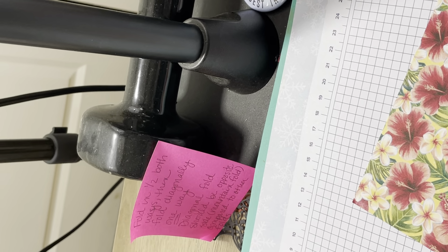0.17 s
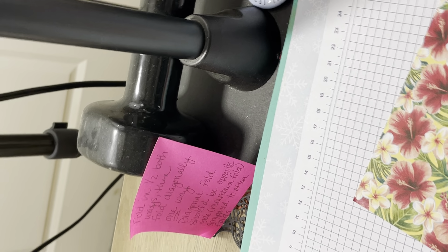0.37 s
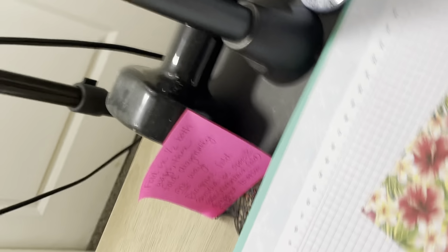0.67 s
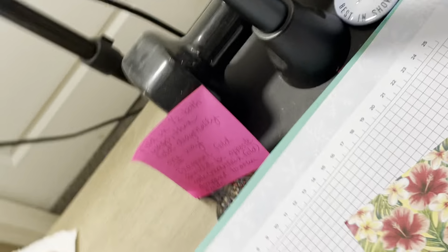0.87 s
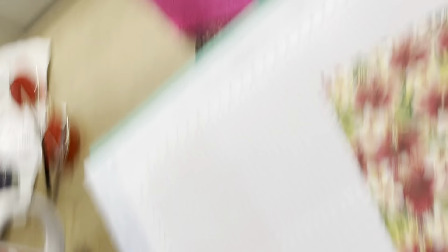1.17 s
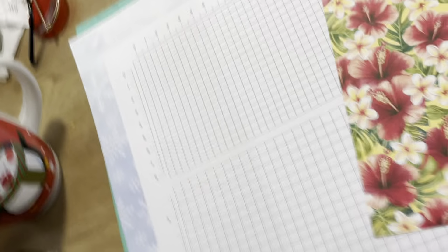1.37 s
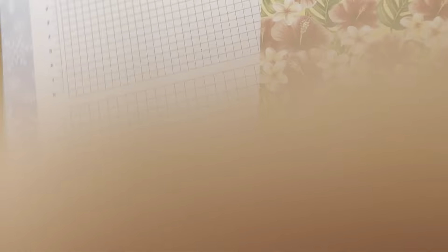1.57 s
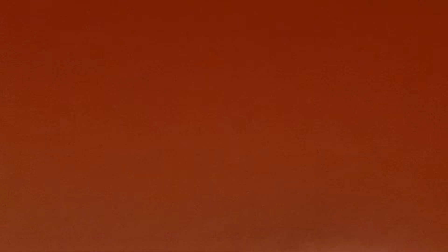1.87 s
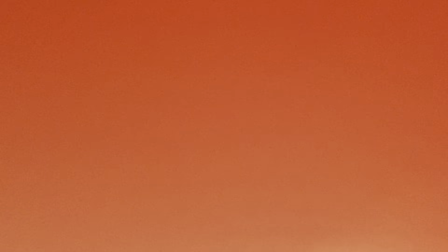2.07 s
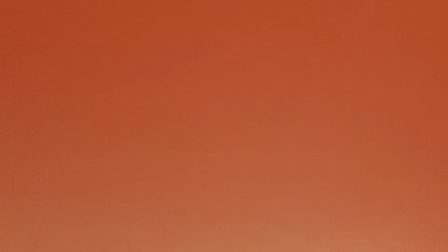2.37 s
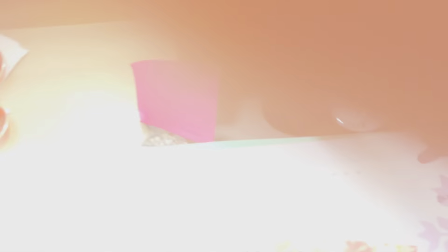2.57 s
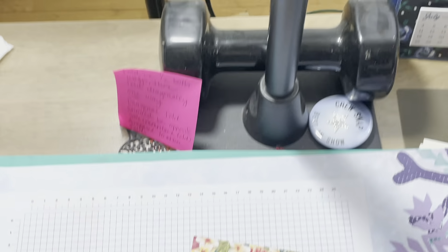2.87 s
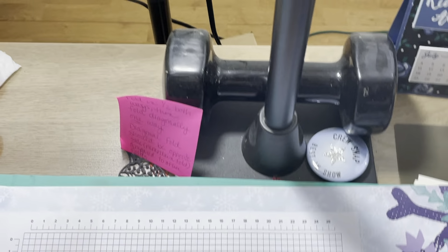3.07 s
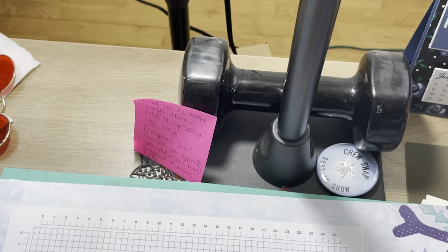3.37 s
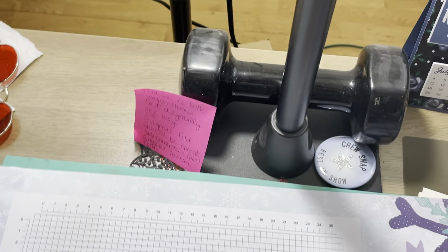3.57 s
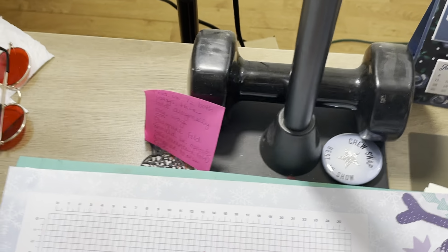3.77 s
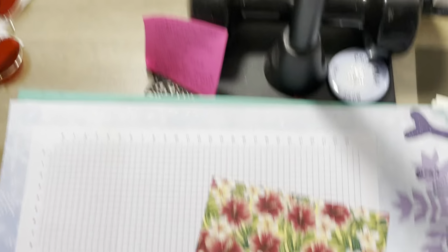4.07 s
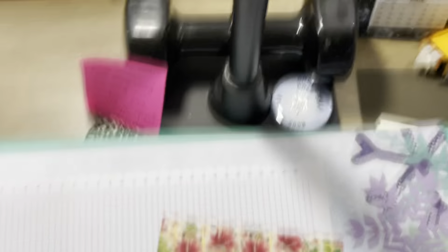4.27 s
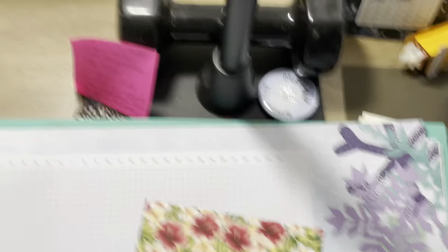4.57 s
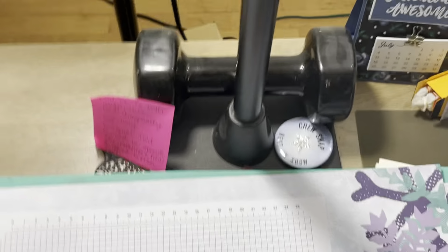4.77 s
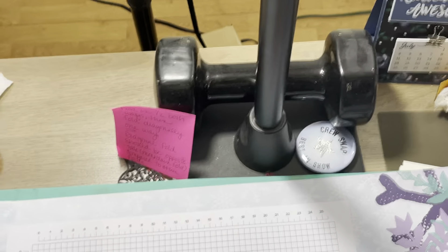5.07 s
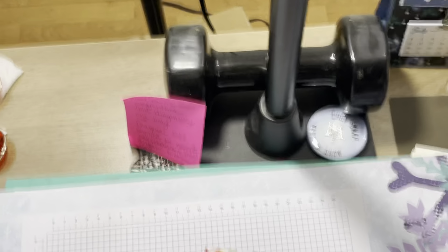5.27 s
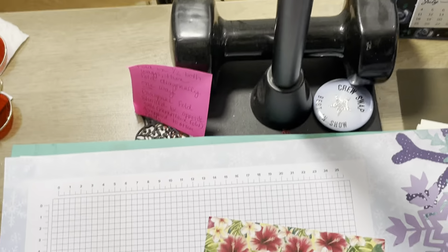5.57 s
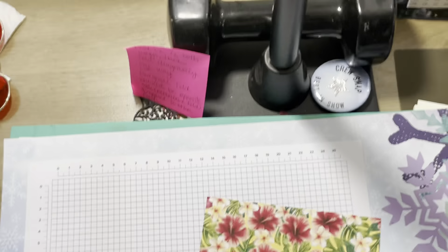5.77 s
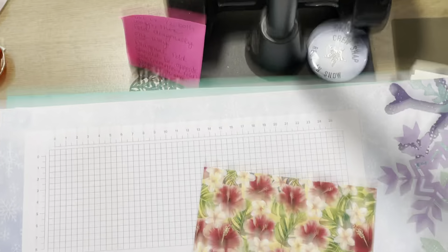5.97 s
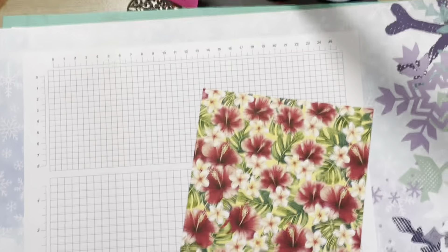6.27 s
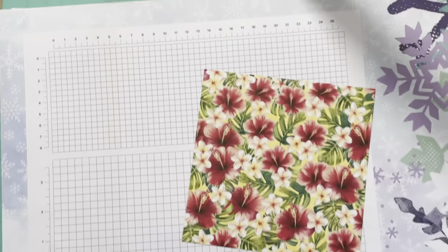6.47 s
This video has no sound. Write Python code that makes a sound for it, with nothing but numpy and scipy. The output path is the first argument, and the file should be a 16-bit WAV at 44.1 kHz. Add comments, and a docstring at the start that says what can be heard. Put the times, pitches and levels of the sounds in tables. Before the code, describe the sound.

Fingers rub over a small camera close up, with irregular knocks and thumps against its holder and a short creak in a quiet room.

```python
"""A small camera is handled above a craft desk in a quiet room. First fingers slide over its case,
hissing and faintly squeaking. Near 1.5 s it knocks and thumps against its holder, then light rubs and
taps go on. The loudest knock comes at 4.3 s, with more close behind. Around 5.5 s a joint of the
holder creaks as it is turned, then settles with tiny clicks among the last knocks. Most of the sound
comes through the case, so it reaches both microphone ports (the sound holes) almost alike."""
import sys
import numpy as np
from scipy import signal
from scipy.fft import rfft, irfft, next_fast_len
from scipy.io import wavfile
from scipy.ndimage import uniform_filter1d

SR = 44100
rng = np.random.default_rng(int(sys.argv[2]) if len(sys.argv) > 2 else 0)


def pcm_store(signal):
    """Save signal as 16-bit PCM."""
    levels = np.round(np.clip(np.atleast_2d(signal), -1, 1) * 32767)
    wavfile.write(sys.argv[1], SR, levels.astype(np.int16).T)


N = 292383

LEAD_IN_S = 0.006  # a short lead-in so the knock's ring can swell just before its tick
# the tones the case rings with: pitch_multiple, level_db, swell_s
CASE_TONES = [(1, 2, 0.0023), (.42, -8.5, 0.0026), (1.8, 3.5, 0.0012), (3.6, -10, 0.00091)]
# knocks on the case: time_s, level_db, pitch_hz, upper_tones_db, tick_db, bright_tick_db
# (the last three are relative to the knock's level)
KNOCKS = [(0.744, -46, 595, -28, -27, -29), (1.119, -44.5, 503, -2, -5.5, -23), (1.235, -39, 580, 1, 3, -5),
          (1.267, -43, 530, 2, 6, 2.5), (1.285, -45, 577, -4, -5, -30), (1.41, -35, 517, 3, 3.5, -19),
          (1.442, -40.5, 540, -15, 10, -26), (1.494, -24.5, 627, 20, -0.5, -30),
          (1.506, -41, 637, 14, 5, -28), (1.555, -41, 484, 5, 5.5, -31), (1.572, -43, 500, 8, 1, -35),
          (1.601, -45, 525, 2, -2, -52), (1.624, -46.5, 493, 0, -4.5, -28), (1.65, -48, 500, -1, 3, -30),
          (1.721, -37, 347, 0.5, -2, -16), (1.872, -38.5, 340, 2, -3, -12),
          (2.559, -49.5, 350, 0, -15, -27), (3.279, -26.5, 744, -18, -12.5, -20.5),
          (3.58, -50, 350, -0.5, -15, -11), (3.973, -41, 378, -8, -43, -15.5),
          (4.192, -29, 463, -29, 7.5, 11), (4.1945, -34.5, 553, -28, 14, -1),
          (4.234, -45, 682, -4, -1, -18), (4.328, -1.5, 782, -1.5, -9.5, -40),
          (4.356, -20.5, 560.6, -8, -4.5, 0.5), (4.3585, -23, 788, 1.5, -11, -15),
          (4.375, -17, 738, -9, -12, -28), (4.622, -53, 293.3, -7, 0, -27),
          (4.8465, -35, 623, -15, -5, -13.5), (4.8518, -17, 630, 5.5, -3.5, -27.5),
          (4.878, -33, 470, -5, -8, -32), (4.8833, -15, 640.5, -1, -12, -15),
          (5.088, -43.5, 615, -8, -38, -30), (5.173, -37.5, 535, -19, -28.5, -24),
          (5.23, -18, 723, -1, -6.5, -24.5), (5.293, -38.5, 355.8, -9, -8, -10),
          (5.335, -36.5, 666, 0, -1, -4), (6.003, -43.5, 320, -3, -3.5, -11),
          (6.053, -22.5, 724, -5, -2.5, -21), (6.065, -34, 331, -7, -23, -4),
          (6.155, -22.5, 610.5, -8, -10.5, -8), (6.232, -37, 339.4, 1, 0, -32),
          (6.488, -39.5, 317, -5, -20, -14), (6.513, -44, 610, -19, -35, -28),
          (6.551, -45.5, 504, -12, -11.5, -10), (6.615, -49, 610, -27.5, -31, -33)]
def knock(level_db, pitch_hz, upper_tones_db, tick_db, bright_tick_db):
    """The case swells into a brief ring that the hand damps; hard contact ticks, then faintly rattles."""
    hiss = rng.standard_normal(SR // 8)
    t = np.arange(len(hiss)) / SR - LEAD_IN_S
    ring = np.zeros(len(t))
    for multiple, tone_db, swell_s in CASE_TONES:
        swell = np.exp(-(t / swell_s - 1) ** 2)  # the high tones peak first
        gain = gain_of(tone_db + upper_tones_db * (multiple > 1))
        ring += gain * swell * np.sin(2 * np.pi * multiple * pitch_hz * t)
    after = np.maximum(t, 0)
    fade = gain_of(-60 * after / 0.0039) + gain_of(-34.5 - 60 * after / 0.13)
    burst = hiss * (1 - np.exp(-after / 0.00079)) * fade
    snap = gain_of(4.5) * signal.unit_impulse(len(t), round(LEAD_IN_S * SR) + 1)
    ticks = gain_of(tick_db) * unit_peak(band(burst + snap, 770, 5400))
    ticks += gain_of(bright_tick_db) * unit_peak(band(burst, 7100, 8600))
    near_pitch = (0.6 * pitch_hz, 1.2 * pitch_hz)
    rattle = unit_rms(band(band(hiss, *near_pitch), *near_pitch)) * gain_of(-20 - 60 * after / 0.09)
    rattle += unit_rms(band(hiss, 1.3 * pitch_hz, 2.8 * pitch_hz)) * gain_of(-25 - 60 * after / 0.06)
    return gain_of(level_db) * (unit_peak(ring) + rattle * (t >= 0) + ticks)


# bumps against the holder: start_s, level_db, final_pitch_hz, fade_s (time to fall by 60 dB)
THUMPS = [(1.494, -17, 54.7, 0.14), (1.746, -35.5, 68, 0.26), (1.87, -41, 101.5, 0.15),
          (2.582, -26, 96, 0.01), (3.279, -35, 72.5, 0.14), (4.195, -22, 70.6, 0.013),
          (4.332, -21.5, 77.1, 0.087), (4.357, -14.5, 71.3, 0.058), (4.375, -31, 53.4, 0.15),
          (4.852, -25, 69.6, 0.07), (4.89, -27, 57.7, 0.19), (5.232, -15.5, 56.7, 0.075),
          (5.337, -29.5, 69, 0.14), (6.056, -31.5, 87.7, 0.29), (6.165, -34, 79, 0.28),
          (6.244, -35.5, 139.5, 0.41)]
def thump(level_db, final_pitch_hz, fade_s, first_pitch_hz=416):
    """A bend runs along the holder, high tones first, so the pitch falls; its arm shudders on."""
    t = np.arange(SR // 3) / SR
    pitch_hz = final_pitch_hz + (first_pitch_hz - final_pitch_hz) * np.exp(-t / 0.005)
    wave = gain_of(-60 * (t / fade_s) ** 1.11) * np.sin(2 * np.pi * np.cumsum(pitch_hz) / SR)
    shudder = gain_of(-15 - 60 * t / 0.18) * unit_rms(band(rng.standard_normal(len(t)), 36, 240))
    rise = 1 - np.exp(-t / 0.0032)
    return gain_of(level_db) * rise * (wave + shudder)


# the tones of one slip's click and of the joint's ring: pitch_hz, width_hz (wider dies sooner), level_db
CLICK_TONES = [(2210, 330, -6), (2850, 430, 5), (4020, 2100, 1.5), (6600, 3600, 12.5), (7600, 1300, -23),
               (13500, 3300, 8)]
JOINT_TONES = [(238.5, 190, 4.5), (741, 95, 10), (880, 69, -3), (1390, 290, -9)]
# the turning joint, one list for each run of slips: time_s, slips_per_s, click_db, ring_db
CREAKS = [
    [(5.372, 177, -50, -48), (5.392, 163, -67, -54.5)],
    [(5.404, 180, -49.5, -49), (5.424, 165, -41.5, -46)],
    [(5.44, 100, -45, -63), (5.454, 128, -40, -31), (5.468, 208, -41.5, -57), (5.478, 111, -36.5, -45),
     (5.497, 155, -45.5, -34), (5.508, 246, -38, -37), (5.556, 321, -47, -36.5), (5.566, 356, -77, -51.5),
     (5.596, 260, -52, -38.5), (5.608, 140, -52, -43.5), (5.63, 160, -53, -50)],
]
def creak(run):
    """The joint sticks and slips over and over: each slip is a sharp click that also rings the joint."""
    time_s, slips_per_s, click_db, ring_db = np.transpose(run)
    t = np.arange(time_s[0], time_s[-1], 1 / SR)
    wobble = 1 + 0.04 * drift(size=80)[:len(t)]
    slip_count = np.floor(np.cumsum(np.interp(t, time_s, slips_per_s) * wobble) / SR)
    slips = np.diff(slip_count, prepend=-1) * gain_of(rng.standard_normal(len(t)))
    clicks = np.convolve(slips * gain_of(np.interp(t, time_s, click_db)), ringing(CLICK_TONES))
    uneven_ring_db = np.interp(t, time_s, ring_db) + 2.53 * rng.standard_normal(len(t))
    rings = np.convolve(slips * gain_of(uneven_ring_db), ringing(JOINT_TONES))
    return band(clicks + rings, 156, 8400)


# single slips as the joint settles: start_s, click_db, ring_db
SETTLING_SLIPS = [(6.178, -62, -51.5), (6.188, -57, -60), (6.197, -63, -56), (6.218, -56, -61),
                  (6.271, -59, -52), (6.296, -62, -62), (6.312, -69, -74), (6.445, -75, -58.5),
                  (6.564, -66, -63), (6.597, -71, -70)]
def settling_slip(click_db, ring_db):
    """One slow slip scuffs for 3 ms and rings the joint."""
    scuff = rng.standard_normal(130)
    ring = ringing(JOINT_TONES)
    click = np.convolve(scuff / np.linalg.norm(scuff), ringing(CLICK_TONES))[:len(ring)]
    return band(gain_of(click_db) * click + gain_of(ring_db) * ring, 166, 9140)


# the tone colours of two hisses and of the case scraping under the skin: pitch_hz, level_db
FINE_HISS = [(5000, -70.5), (7500, -28.5), (9000, -3), (11500, -7), (13800, -3.5), (15500, -10),
             (15900, -72.5)]
COARSE_HISS = [(2000, -71.5), (3800, -17), (5200, -7.5), (7500, -3.5), (9000, -5), (11500, -16.5),
               (14000, -78)]
SCRAPE = [(60, -69), (300, 8), (700, 7.5), (1100, -1), (1400, 5), (1750, -0.5), (2100, -1.5), (2330, 2.5),
          (2550, -1.5), (3100, -4.5), (3800, -8.5), (5000, -14), (6500, -24.5), (10000, -72.5)]
# finger strokes: start_s, swell_s, fade_s, fine_hiss_db, coarse_hiss_db, scrape_db
STROKES = [(0.362, 0.0042, 0.032, -80, -95, -74), (0.442, 0.0027, 0.079, -100, -78, -70.5),
           (0.529, 0.016, 0.074, -82, -84.5, -72.5), (0.748, 0.078, 0.1, -78, -77, -67.5),
           (0.947, 0.0051, 0.14, -82, -86.5, -71), (1.115, 0.014, 0.75, -76.5, -75.5, -65),
           (1.351, 0.087, 0.035, -58, -60.5, -56), (1.453, 0.046, 0.0054, -44.5, -45, -45),
           (1.498, 0.0072, 0.045, -60, -66, -59), (1.625, 0.083, 0.23, -71, -71, -60),
           (1.875, 0.15, 0.081, -68, -69, -63.5), (2.143, 0.14, 0.094, -79, -75.5, -68),
           (2.383, 0.037, 0.065, -81, -74, -69), (2.581, 0.042, 0.019, -72, -80, -59),
           (2.61, 0.073, 0.025, -69.5, -74, -64), (2.7, 0.051, 0.016, -69, -68, -65.5),
           (2.948, 0.016, 0.06, -85, -90, -74), (3.283, 0.01, 0.096, -82, -77, -72),
           (3.75, 0.031, 0.035, -67.5, -66.5, -62.5), (4.09, 0.12, 0.061, -83, -76, -70.5),
           (4.195, 0.0018, 0.036, -53, -51.5, -51.5), (4.245, 0.01, 0.089, -85, -70.5, -68),
           (4.332, 0.013, 0.079, -64.5, -61, -55.5), (4.677, 0.049, 0.018, -68, -65, -75.5),
           (4.856, 0.023, 0.12, -79.5, -73, -62.5), (5.14, 0.087, 0.014, -65, -72, -60),
           (5.243, 0.064, 0.012, -69, -79, -60), (5.326, 0.0041, 0.093, -66, -67, -55),
           (5.441, 0.038, 0.16, -82, -65, -53.5), (5.63, 0.046, 0.14, -81, -75.5, -67.5),
           (5.75, 0.055, 0.01, -64.5, -62, -57.5), (6.057, 0.013, 0.11, -84, -84, -75),
           (6.159, 0.011, 0.16, -73, -73.5, -68.5), (6.419, 0.067, 0.034, -71.5, -82, -84)]
def sliding_fingers(land_s=0.0045, leave_s=0.037, touch_db=-10.5, lift_db=-8):
    """Skin slides over the case in strokes that start and stop quickly; uneven contact flutters."""
    t, powers = np.arange(N) / SR, np.zeros((3, N))
    for start_s, swell_s, fade_s, *levels_db in STROKES:
        times = start_s + np.cumsum([-land_s, land_s, swell_s, fade_s, leave_s])
        ends_db = np.where(t < times[2], touch_db, lift_db)
        arch_db = ends_db * np.interp(t, times[1:4], [1, 0, 1]) ** 2  # a rounded top between lower ends
        outline_db = np.interp(t, times, [-21.5, 0.5, 1.5, -1.5, -17], left=-200, right=-200)
        powers += gain_of(np.add.outer(levels_db, arch_db + outline_db)) ** 2
    layers = [noise(colour, size=512, patchy_db=db)
              for colour, db in ((FINE_HISS, 1.2), (COARSE_HISS, 1.5), (SCRAPE, 2.2))]
    return sum(np.sqrt(power) * layer * gain_of(1.8 * drift(size=100))
               for power, layer in zip(powers, layers))


# the tone colours of the hand's rumble and dull rubbing: pitch_hz, level_db
RUMBLE = [(10, -67.5), (40, -6.5), (78, 8.5), (120, -0.5), (240, -1.5), (400, -25.5), (1000, -87.5)]
RUBBING = [(60, -62), (300, 1), (550, -2), (750, -7), (1200, -14), (2200, -33.5), (6000, -71)]
# how loud the grip is over time: time_s, rumble_db, rubbing_db
GRIP = [(0.0, -72, -79), (0.41, -66, -80.5), (0.57, -61, -69.5), (1.44, -57.5, -64.5), (1.66, -56, -75),
        (2.25, -63.5, -71), (3.86, -64.5, -74.5), (4.301, -55.5, -63), (4.67, -61, -72), (4.89, -60, -70),
        (5.04, -46.5, -62), (5.21, -47.5, -57), (5.35, -51, -61), (5.48, -48, -43), (5.76, -50.5, -59.5),
        (6.0, -56.5, -63.5), (6.259, -47.5, -53.5), (6.63, -50, -70.5)]
def gripping_hand():
    """The hand shakes and presses the case, making an uneven rumble and a dull rubbing."""
    t = np.arange(N) / SR
    time_s, rumble_db, rubbing_db = np.transpose(GRIP)
    unevenness = gain_of(1.8 * drift(size=800))
    rumble = gain_of(np.interp(t, time_s, rumble_db)) * noise(RUMBLE, size=2048, patchy_db=-1.6)
    rubbing = gain_of(np.interp(t, time_s, rubbing_db)) * noise(RUBBING, size=1024, patchy_db=1.2)
    return unevenness * (rumble + rubbing)


# skin squeaking on the case: start_s, length_s, pitch_hz, level_db
SQUEAKS = [(0.761, 0.083, 2300, -76.5), (1.613, 0.23, 3720, -64), (1.637, 0.23, 5240, -72),
           (1.648, 0.16, 2920, -67), (1.648, 0.2, 4500, -74), (5.153, 0.076, 2260, -61),
           (5.145, 0.071, 1420, -59.5), (5.267, 0.051, 1580, -58), (5.372, 0.028, 1670, -48.5)]
def squeak(length_s, pitch_hz, level_db, spread=0.11):
    """Skin catches on the case: a breathy, narrow whistle swells and dies."""
    hiss = rng.standard_normal(SR // 3)
    whistle = band(hiss, pitch_hz * (1 - spread), pitch_hz * (1 + spread))[-round(length_s * SR):]
    swell = np.sin(np.linspace(0, np.pi, len(whistle)))
    return gain_of(level_db) * unit_rms(whistle) * swell


def case_bending(blows):
    """Blows also bend the case, which shifts the left and right ports in opposite ways."""
    lagging = signal.hilbert(blows, next_fast_len(N))[:N].imag  # a quarter of a cycle behind the blow
    middle = band(band(lagging, 300, 2900)[::-1], 300, 3200)[::-1]  # forwards, then backwards
    wall = band(blows, 480, 950)  # the right port sits nearer the ringing wall
    bend = gain_of(-16.5) * middle + gain_of(-26.5) * lagging + gain_of(-19.5) * wall
    return np.outer([-1, 1], bend)


# the tone colour of the quiet room: pitch_hz, level_db
ROOM_COLOUR = [(18, -58), (30, -35), (53, -32.5), (64, -3.5), (86, -2), (108, -16), (182, -19),
               (338, -37.5), (1000, -46.5), (1130, -40.5), (1270, -42.5), (1700, -39.5), (3100, -49.5),
               (8500, -52.5), (14000, -53), (15800, -75)]
def room_tone(level_db=-62):
    """A low rumble and a faint hiss lie under everything."""
    return gain_of(level_db) * noise(ROOM_COLOUR, size=2048, patchy_db=1.0)


# how alike the noise is on the left and right: pitch_hz, likeness (1 means the same)
LIKENESS = [(60, 0.87), (400, 0.89), (800, 0.28), (1700, 0.93), (3000, 1), (6000, 0.89), (8000, 1),
            (16000, 0.94)]
def noise(colour, size, patchy_db):
    """Stereo noise of rms 1, built in blocks of size samples, with louder and softer patches."""
    hop, hz = size // 4, np.fft.rfftfreq(size, 1 / SR)
    a, b, c, d, patches = rng.standard_normal((N // hop + 5, len(hz), 5)).T
    patches = uniform_filter1d(patches, size // 64, axis=0)  # smooth across pitch
    patches = unit_rms(uniform_filter1d(patches, 8192 // size, axis=1))  # and across time
    likeness = np.clip(value_at(LIKENESS, hz), -1, 1)[:, None]
    left = a + 1j * b
    right = likeness * left + np.sqrt(1 - likeness ** 2) * (c + 1j * d)
    spectra = np.array([left, right]) * gain_of(value_at(colour, hz)[:, None] + patchy_db * patches)
    return unit_rms(signal.istft(spectra, nperseg=size, noverlap=size - hop)[1][:, :N])


def ringing(tones):
    """Fading tones set off by one click."""
    t = np.arange(1500) / SR
    return sum(gain_of(db) * np.exp(-np.pi * width_hz * t) * np.sin(2 * np.pi * hz * t)
               for hz, width_hz, db in tones)


def drift(size):
    """A smooth random wander of rms 1 that changes over about size samples."""
    wander = rng.standard_normal(N)
    for _ in range(3):
        wander = uniform_filter1d(wander, size)
    return unit_rms(wander)


def band(x, low_hz, high_hz):
    """Lets through the pitches between two limits."""
    return signal.sosfilt(signal.butter(2, [low_hz, high_hz], "band", fs=SR, output="sos"), x)


def value_at(table, hz):
    """Reads between a table's rows, with octaves evenly spaced."""
    pitch_hz, value = np.transpose(table)
    return np.interp(np.log(hz + 1), np.log(pitch_hz + 1), value)


def gain_of(db):
    """Turns decibels into a multiplier."""
    return 10 ** (np.asarray(db) / 20)


def unit_rms(x):
    """Scales a sound so its average strength (rms) is 1."""
    return x / np.sqrt(np.mean(x ** 2) + 1e-20)


def unit_peak(x):
    """Scales a sound so its biggest swing is 1."""
    return x / abs(x).max()


def add(mix, start_s, sound):
    """Mixes a sound in at its start time."""
    part = mix[round(start_s * SR):][:len(sound)]
    part += sound[:len(part)]


def scene():
    """Short sounds travel through the case and bend it; the room, fingers and hand sound around them."""
    case = np.zeros(N)
    for time_s, *settings in KNOCKS:
        add(case, time_s - LEAD_IN_S, knock(*settings))
    for table, source in ((THUMPS, thump), (SQUEAKS, squeak)):
        for start_s, *settings in table:
            add(case, start_s, source(*settings))
    for run in CREAKS:
        add(case, start_s=run[0][0], sound=creak(run))
    for start_s, *settings in SETTLING_SLIPS:
        add(case, start_s, settling_slip(*settings))
    return case + case_bending(case) + room_tone() + sliding_fingers() + gripping_hand()


# how far the stereo effect moves the right channel's wave ahead of the left: pitch_hz, shift_radians
STEREO_PHASE = [(0, 0), (2000, 0), (3100, -.6), (5300, -.5), (5600, 1.5), (6500, .9), (8700, np.pi),
                (13600, 2 * np.pi)]
def record(dry, top_hz=16300):
    """The recorder's stereo effect widens the treble by putting it out of step; the very top is cut."""
    size = next_fast_len(N + 4096)
    hz = np.fft.rfftfreq(size, 1 / SR)
    half_shift = np.exp(0.5j * np.interp(hz, *np.transpose(STEREO_PHASE)))
    widened = irfft(rfft(dry, size) * [1 / half_shift, half_shift], size)[:, :N]
    low_pass = signal.firwin(255, top_hz, window=("kaiser", 9), fs=SR)
    return signal.oaconvolve(widened, low_pass[None], "same")


dry = scene()
out = record(dry)
pcm_store(out)
```